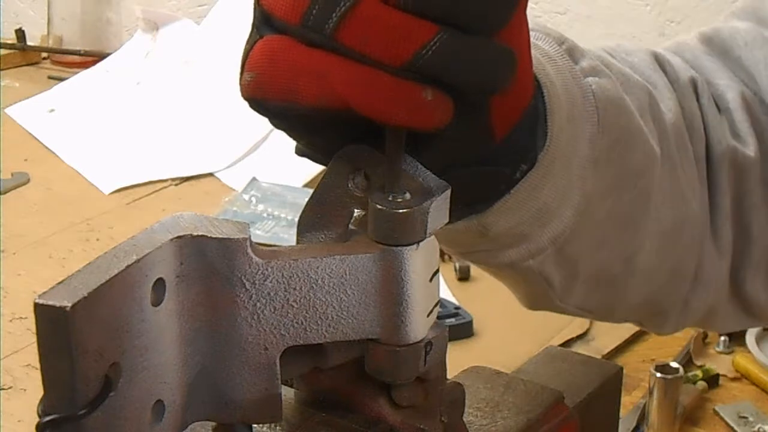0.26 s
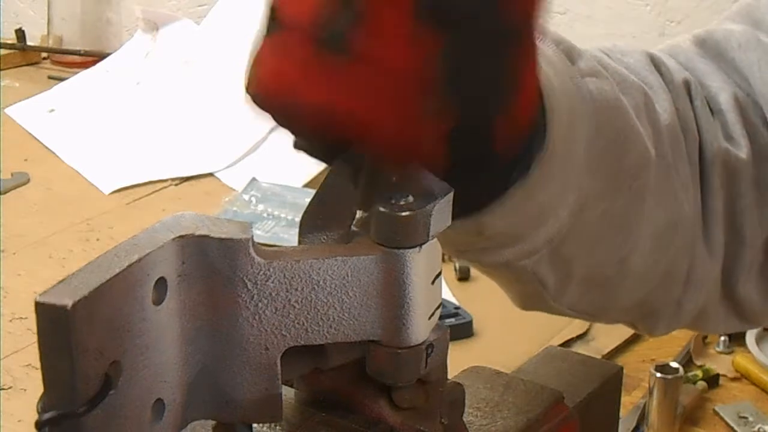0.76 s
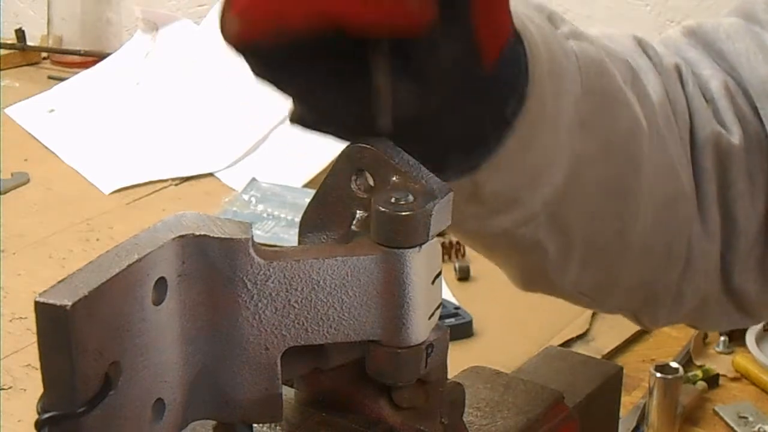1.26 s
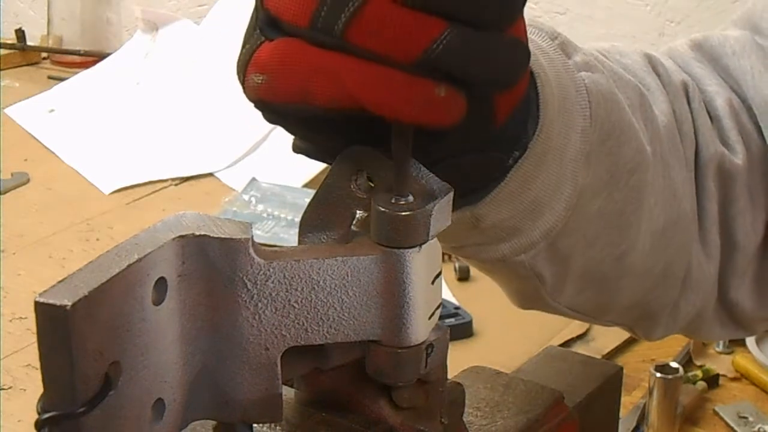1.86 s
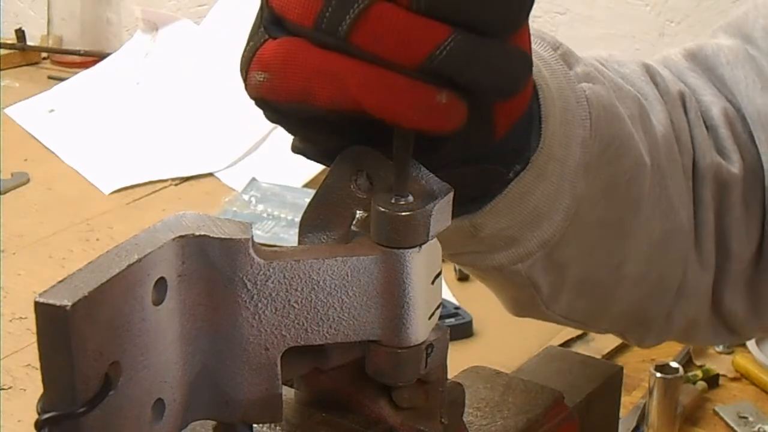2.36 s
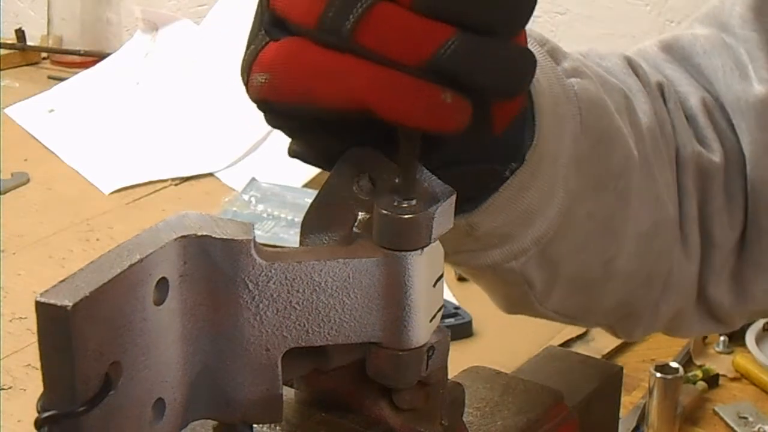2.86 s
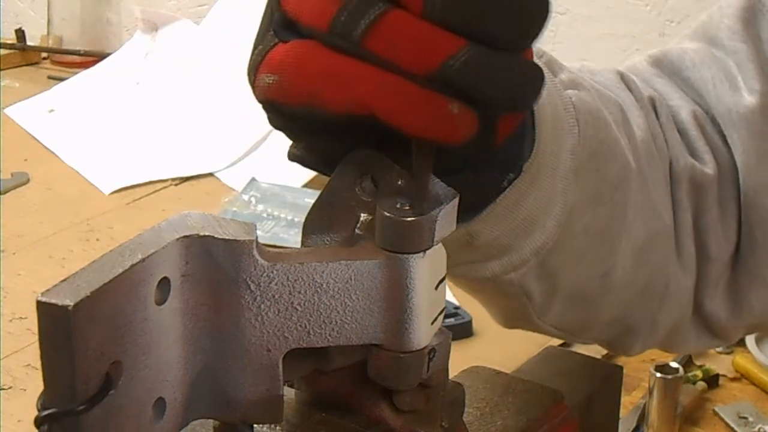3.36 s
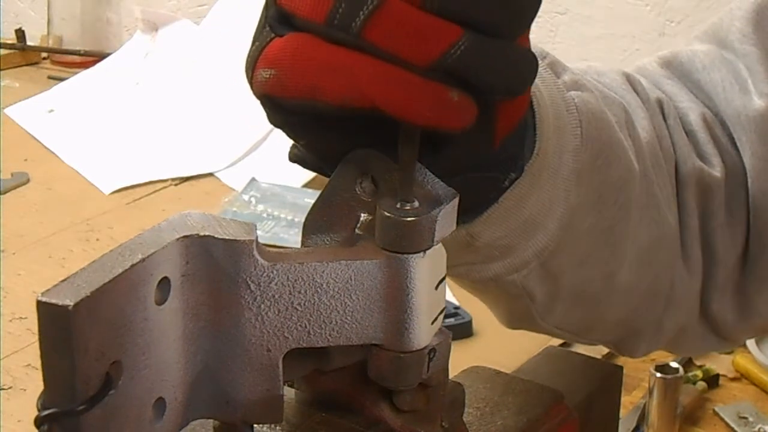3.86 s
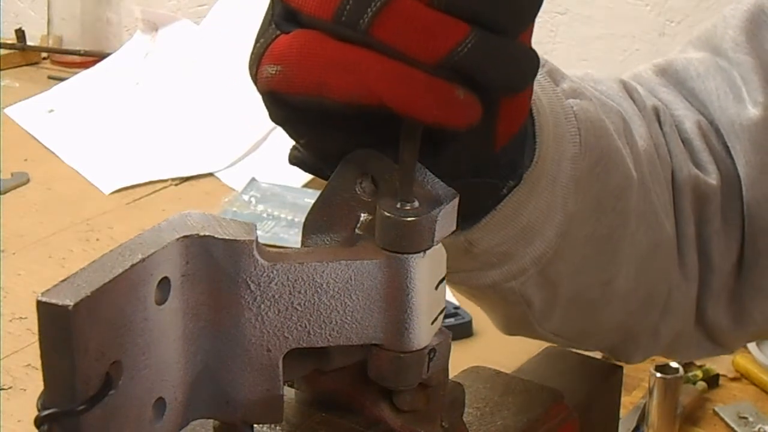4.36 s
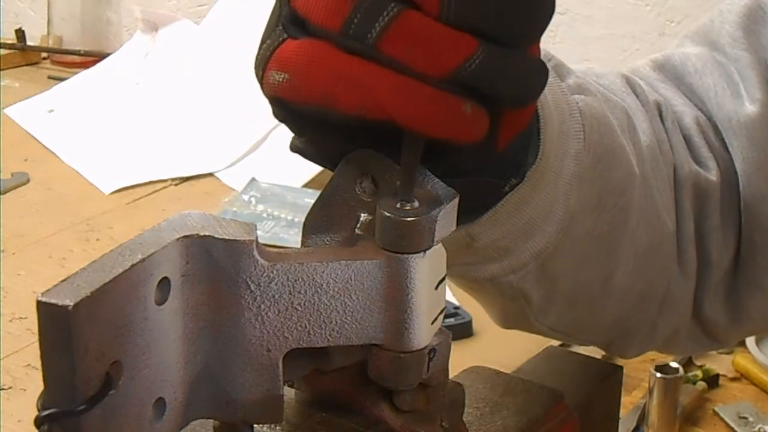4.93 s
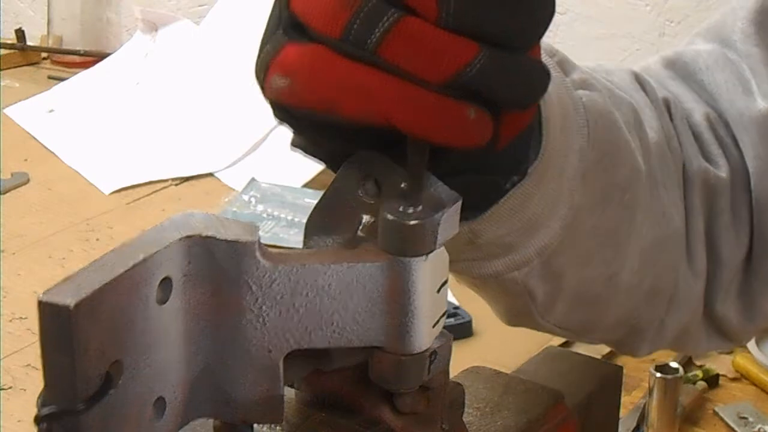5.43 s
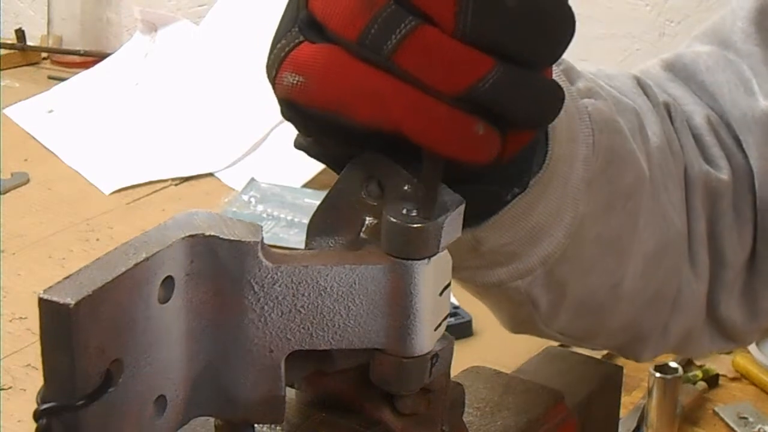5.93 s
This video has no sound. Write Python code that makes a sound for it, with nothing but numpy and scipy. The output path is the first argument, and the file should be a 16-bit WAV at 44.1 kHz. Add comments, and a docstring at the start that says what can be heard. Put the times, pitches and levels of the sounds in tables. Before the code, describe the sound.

A quiet, steady room hiss with a faint soft whine runs throughout. Glove and sleeve rub at the start, with a dull low bench bump near 0.3. At 0.5 and 0.8 two hard hammer blows hit a steel punch: an instant bright crack, then vise, hinge and small room swelling into a dense clang that dies within about a quarter second, crushed and crackling in the overloaded close microphone. A light double tap follows near 1.0, cloth rustle from 1.1, a faint hollow knock at 1.9 and ticks at 2.1 and 2.4. Stronger blows land at 2.8 and 3.15. A brighter double touch clicks at 3.4, a tick at 3.6, and a clearer hollow knock at 3.9 with a faint bump. Soft rustling and barely audible ticks fill the lull until three rapid heavy clangs at 5.5, 5.8 and 6.15, the last ringing slightly longer.

```python
"""Glove and sleeve rustle over steady room hiss, then a hammer drives a steel punch against a hinge pin in a vise.
Each blow sings in the punch, then sets hinge, vise, bench and small garage clanging, and overloads the microphone.
Between bursts: light hammer touches, hollow knocks as the punch is seated again, small ticks, dull bench bumps.
Metal is decaying sine modes plus shaped noise; cloth and air are shaped noise; the bench is a decaying sine."""
import sys
import numpy as np
from scipy import signal
from scipy.fft import rfft, irfft
from scipy.io import wavfile
from scipy.ndimage import uniform_filter1d, minimum_filter1d

SR = 44100
rng = np.random.default_rng(int(sys.argv[2]) if len(sys.argv) > 2 else 0)


def master_out(mix):
    """Clip the mix to full scale and print it as 16-bit PCM to the path in sys.argv[1]."""
    frames = np.transpose(np.atleast_2d(mix))
    ceiling = np.clip(frames, -1, 1)
    pcm = np.round(ceiling * 32767).astype(np.int16)
    wavfile.write(sys.argv[1], SR, pcm)


N = 272979
AGE_S = np.arange(int(0.6 * SR)) / SR  # time since a contact
CUTOFF_HZ = 11450

# All dB are relative; noise spectra give the colour only, "tilt" is brightness about 2 kHz.
# room air: (frequency [Hz], density [dB per Hz])
AIR_SPECTRUM = [(25, -31.5), (55, -6.5), (100, -17), (170, -12.5), (240, -5), (290, -10), (400, -5.5),
                (1000, -6), (2200, -7), (3000, -10.5), (5000, -17.5), (8000, -22.5), (11000, -34.5)]
# hand movements: (start [s], swell [s], hold [s], dying away [dB/s], rub [dB], swish [dB])
HAND_MOVES = [(0, 0.0022, .22, 43, -49.5, -52), (1.1, 0.084, 0.013, 17, -55.5, -62.5),
              (1.22, 0.12, 0, 54.5, -62, -57.5), (2.125, 0.046, 0, 318, -54.5, -51),
              (2.353, .075, .11, 24, -51.5, -56), (3.62, 0.04, 0.054, 35, -57.5, -64),
              (3.87, 0.1, 0.059, 16, -53, -61.5), (4.948, .4, 0.094, 49.5, -63.5, -63.5)]
# low cloth rub: (frequency [Hz], density [dB per Hz])
RUB_SPECTRUM = [(40, -16), (150, -9.5), (400, 0), (1000, 2), (2200, 4), (3200, -3.5), (6000, -13.5),
                (11000, -38)]
# higher cloth swish: (frequency [Hz], density [dB per Hz])
SWISH_SPECTRUM = [(800, -17.5), (2200, -1.5), (3800, 2), (6000, -7.5), (9000, -9.5), (11000, -26.5)]
# dull bumps through the bench: (time [s], level [dB])
BENCH_BUMPS = [(0.258, -55.5), (3.876, -63)]
# full blows: (time [s], force [dB], tilt of the clanging [dB/octave], clang t60 [ratio], clang rise [s])
FULL_BLOWS = [(0.5158, -7, 0, 1.15, 0.0031), (0.8104, -3.5, 0.74, 1.127, 0.0089),
              (2.8154, -1.5, 0.65, 1.07, 0.01), (3.1532, -2.5, 0.4, 1.14, 0.0091),
              (5.4810, -1.5, 0.56, 1.077, .011), (5.8329, -2, 0.63, 1.122, 0.015),
              (6.1602, -5, 0.35, 1.66, 0.0048)]
# steel-on-steel contact: (frequency [Hz], density [dB per Hz])
CRACK_SPECTRUM = [(60, -24), (500, -13.5), (1400, 1.5), (3000, -2.5), (4300, 0.5), (6000, -7.5),
                  (8000, -6.5), (9500, -17.5), (11000, -20.5)]
# punch under a full blow: (frequency [Hz], level [dB], t60 [s])
PUNCH_RING = [(1310, -9, .05), (3700, -8, .05), (4170, -6, .06), (7375, 7, .05), (7430, -9, .27)]
# lower ring of vise and hinge: (frequency [Hz], level [dB], t60 [s])
VISE_RING = [(326, -4, .26), (356, -3, .23), (394, -5, .22), (590, -6, .2), (633, -4, .24), (682, -3, .21),
             (775, 1, .24), (815, -2, .28), (895, -8, .23), (1025, -1, .24), (1151, -5, .23),
             (1186, -6, .24), (1300, -2, .22), (1366, -4, .2), (1430, -7, .22), (1643, -3, .24),
             (1684, -6, .3), (1724, -7, .3), (1826, -8, .3), (1934, -4, .3), (2040, -8, .26),
             (2175, -6, .27)]
# upper ring of vise and hinge: (frequency [Hz], level [dB], t60 [s])
HINGE_RING = [(2775, -9, .21), (3235, -8, .21), (3347, -7, .22), (3676, -3, .22), (3905, -6, .23),
              (4232, -7, .22), (4335, -2, .23), (4593, -5, .2), (5135, -4, .22), (5378, -6, .24),
              (5858, -10, .23), (6271, -9, .23), (6440, -10, .26), (7387, -7, .24)]
# dense clang of bench and room: (frequency [Hz], density [dB per Hz])
CLANG_SPECTRUM = [(25, -15.5), (60, -7), (130, -8.5), (260, -5), (350, 0.5), (500, 0.5), (800, 2),
                  (1500, 0), (2600, -3.5), (4000, -0.5), (5500, -5.5), (7500, -8), (9000, -13.5),
                  (11000, -31.5)]
# clang decay at length ratio 1: (frequency [Hz], t60 [s])
CLANG_DECAY = [(50, 0.28), (120, 0.24), (300, 0.28), (800, 0.26), (1900, 0.25), (3000, 0.23), (5000, 0.23),
               (7500, 0.19), (10000, 0.16)]
# light hammer touches: (time [s], force [dB], click sharpness [dB], ring tilt [dB/octave])
LIGHT_TAPS = [(1.024, -25, -25, -1), (1.040, -25.5, -13, -2), (3.4299, -30.5, 1, -1),
              (3.4414, -18, -1.5, 0.5)]
# click of a light touch: (frequency [Hz], density [dB per Hz])
TAP_CLICK_SPECTRUM = [(200, -24), (1000, -2.5), (1600, 0), (2500, 11), (3300, -5), (4300, 18), (5000, -7),
                      (5800, 9.5), (6700, -18.5), (7800, 5), (9500, -4.5), (11000, -49)]
# loosely held punch: (frequency [Hz], level [dB], t60 [s])
LOOSE_PUNCH_RING = [(770, -3, .34), (900, -2, .3), (1040, -2, .3), (1700, -8, .15), (2250, -6, .18),
                    (2449, -4, .2), (3101, -5, .22), (4090, -4, .17), (4317, -2, .24), (4500, -5, .17),
                    (5039, -6, .24), (5300, -7, .22), (5545, -5, .24), (5750, -6, .24), (5900, -6, .28)]
# punch seated in the pin hole: (time [s], force [dB], pitch [ratio], late ring tilt [dB/octave], ring freedom [dB])
SEATING_KNOCKS = [(1.8860, -38, 0.81, -2.5, -3.5), (3.8611, -27, 0.99, -4, 0.5), (4.727, -48, 0.91, -1, -5)]
# hollow knock at first: (frequency [Hz], density [dB per Hz])
KNOCK_CLICK_SPECTRUM = [(200, -70.5), (800, 7), (1900, 28), (3000, 1), (4300, 14), (6000, -32.5),
                        (11000, -56)]
# hollow knock returned by the room: (frequency [Hz], density [dB per Hz])
KNOCK_ROOM_SPECTRUM = [(150, -29), (500, -5.5), (900, 6.5), (1500, -5), (2000, 0), (3000, -15), (9000, -40)]
# punch in its hole, at pitch ratio 1, before extra damping: (frequency [Hz], level [dB], t60 [s])
SEATED_RING = [(766, -7, .2), (1140, -8, .18), (1250, -3, .2), (1836, -6, .15), (1936, 2, .2),
               (2400, -11, .05), (3850, -18, .04)]
# small ticks of the gripped punch: (time [s], level [dB])
GRIP_TICKS = [(2.061, -46), (2.419, -37), (3.606, -49), (4.514, -49.5), (5.378, -51)]


def from_db(db):
    """Decibels to gain."""
    return 10 ** (np.asarray(db) / 20)


def rms_one(x):
    """Scale to unit rms."""
    return x / np.sqrt(np.mean(x ** 2) + 1e-20)


def at_hz(points, hz):
    """Read a table on a log-frequency axis."""
    known_hz, values = np.transpose(points)
    return np.interp(np.log(hz + 1), np.log(known_hz), values)


def bins_hz(size):
    """Frequencies of a real spectrum."""
    return np.arange(size // 2 + 1) * SR / size


def noise(spectrum, size):
    """Gaussian noise of a given colour, rms 1."""
    white = rfft(rng.standard_normal(size))
    gain = from_db(at_hz(spectrum, bins_hz(size)))
    return rms_one(irfft(white * gain, size))


def fade(t60_s):
    """Exponential decay after a contact, 60 dB in t60."""
    return np.exp(-np.log(1000) * AGE_S / max(t60_s, 1e-3))


def add(track, time_s, sound):
    """Mix a sound in at a time."""
    start = max(round(time_s * SR), 0)
    track[start:start + len(sound)] += sound[:max(N - start, 0)]


def air(air_db=-59, whine_hz=2270, whine_width_hz=150, whine_db=-67):
    """Steady broadband hiss with one soft resonance standing out."""
    b, a = signal.iirpeak(whine_hz, whine_hz / whine_width_hz, fs=SR)
    whine = rms_one(signal.lfilter(b, a, rng.standard_normal(N)))
    return from_db(air_db) * noise(AIR_SPECTRUM, N) + from_db(whine_db) * whine


def cloth(grain_rms_db=1.0):
    """Fabric slides on fabric in fine grains; each hand movement drives a low rub and a higher swish."""
    t = np.arange(N) / SR
    rub_power, swish_power = 0, 0
    for start_s, swell_s, hold_s, fall_db_per_s, rub_db, swish_db in HAND_MOVES:
        push = np.clip((t - start_s) / max(swell_s, 1e-3), 0, 1)
        falling_s = np.maximum(t - start_s - swell_s - hold_s, 0)
        speed = push * from_db(-fall_db_per_s * falling_s)
        rub_power = rub_power + (speed * from_db(rub_db)) ** 2
        swish_power = swish_power + (speed * from_db(swish_db)) ** 2
    flutter = rms_one(uniform_filter1d(rng.standard_normal(N), size=200))
    grain = from_db(grain_rms_db * flutter)
    rub = np.sqrt(rub_power) * noise(RUB_SPECTRUM, N)
    swish = np.sqrt(swish_power) * noise(SWISH_SPECTRUM, N)
    return grain * (rub + swish)


def bench(hz, t60_s):
    """The workbench flexes under a push: one decaying low sine."""
    return np.sin(2 * np.pi * hz * AGE_S) * fade(t60_s)


def bumps():
    """Dull bumps flex the bench."""
    out = np.zeros(N)
    for time_s, level_db in BENCH_BUMPS:
        add(out, time_s, from_db(level_db) * bench(hz=62, t60_s=0.52))
    return out


def ring(modes, pitch=1, tilt_db=0, wet=0.6, scatter_hz=55):
    """Struck modes; reflections add a wandering share that makes each one beat and blur."""
    out = 0
    wet = np.clip(wet, 0, 1)  # power share of the reflections
    for hz, level_db, t60_s in modes:
        luck = rng.standard_normal((2, 256))
        # complex gain: a new random point scatter_hz times a second
        points = luck[0] + 1j * luck[1]
        echoes = np.interp(AGE_S * scatter_hz, np.arange(len(points)), points) / np.sqrt(2)
        carrier = np.exp(2j * np.pi * (hz * pitch * AGE_S + rng.random()))
        tone = (np.sqrt(1 - wet) + np.sqrt(wet) * echoes) * carrier
        gain = from_db(level_db + tilt_db * np.log2(hz / 2000))
        out = out + gain * fade(t60_s) * tone.real
    return out


def clang(length=1, tilt_db=0):
    """Countless overlapping modes and wall reflections as noise, each band dying at its own rate."""
    size = len(AGE_S)
    hz = bins_hz(size)
    tilt = from_db(tilt_db * np.log2((hz + 200) / 2000))
    dense = rfft(noise(CLANG_SPECTRUM, size)) * tilt
    band_log_hz = np.log(np.array(CLANG_DECAY)[:, 0])
    out = 0
    for share, (_, t60_s) in zip(np.eye(len(CLANG_DECAY)), CLANG_DECAY):
        band = np.interp(np.log(hz + 1), band_log_hz, share)  # overlapping triangles
        out = out + irfft(dense * band, size) * fade(t60_s * length)
    return out


def swell(delay_s, rise_s):
    """Heavy parts and room take a few milliseconds to answer."""
    return 1 - np.exp(-(np.maximum(AGE_S - delay_s, 0) / rise_s) ** 2)


def blows(crack_db=-8, crack_t60_s=0.078, punch_db=-12, vise_db=-12.0, hinge_db=-13,
          clang_db=-1, early_db=4.5, early_s=0.053, bench_db=-27):
    """The punch cracks and sings at once; hinge, vise and room swell in after it, over a flexing bench."""
    out = np.zeros(N)
    early = from_db(early_db * np.exp(-(AGE_S / early_s) ** 4))  # first wall reflections arrive in a bunch
    for time_s, force_db, tilt_db, length, rise_s in FULL_BLOWS:
        crack = from_db(crack_db) * noise(CRACK_SPECTRUM, len(AGE_S)) * fade(crack_t60_s)
        punch = from_db(punch_db) * ring(PUNCH_RING, wet=0.15)
        vise = from_db(vise_db) * ring(VISE_RING, tilt_db=tilt_db, wet=0.4, scatter_hz=30.65)
        hinge = from_db(hinge_db) * ring(HINGE_RING, tilt_db=tilt_db, wet=0.84, scatter_hz=64.73)
        room = from_db(clang_db) * clang(length, tilt_db)
        body = (vise + hinge + room) * swell(0.0012, rise_s) * early
        flex = from_db(bench_db) * bench(hz=48, t60_s=0.34)
        add(out, time_s, from_db(force_db) * (crack + punch + body + flex))
    return out


def taps(click_t60_s=0.05, modes_db=-20, room_db=-19):
    """A light touch clicks, with the loosely held punch and the room ringing behind it."""
    out = np.zeros(N)
    for time_s, force_db, sharp_db, tilt_db in LIGHT_TAPS:
        click = from_db(sharp_db) * noise(TAP_CLICK_SPECTRUM, len(AGE_S)) * fade(click_t60_s)
        punch = from_db(modes_db) * ring(LOOSE_PUNCH_RING, tilt_db=tilt_db, wet=0.8, scatter_hz=105.0)
        room = from_db(room_db) * clang(1.0, -0.28)
        body = (punch + room) * swell(0, 0.0078)
        add(out, time_s, from_db(force_db) * (click + body))
    return out


def knocks(click_db=-1, strike_db=-1, modes_db=-2, room_db=-8):
    """The punch drops into its hole with a hollow knock that the room carries on."""
    out = np.zeros(N)
    for time_s, force_db, pitch, tilt_db, free_db in SEATING_KNOCKS:
        click = from_db(click_db) * noise(KNOCK_CLICK_SPECTRUM, len(AGE_S)) * fade(0.022)
        strike = from_db(strike_db + free_db) * ring(SEATED_RING, pitch, wet=0.084)
        strike = strike * fade(0.078) * swell(0, 0.00082)
        late_ring = from_db(modes_db + free_db) * ring(SEATED_RING, pitch, tilt_db, wet=0.6, scatter_hz=60)
        room = from_db(room_db) * noise(KNOCK_ROOM_SPECTRUM, len(AGE_S)) * fade(0.39)
        after = (late_ring + room) * swell(0.0046, 0.0042)
        add(out, time_s, from_db(force_db) * (click + strike + after))
    return out


def ticks(room_db=-19):
    """The punch ticks under the glove: a very short steel contact and a faint clang."""
    out = np.zeros(N)
    for time_s, level_db in GRIP_TICKS:
        contact = noise(CRACK_SPECTRUM, len(AGE_S)) * fade(0.008)
        add(out, time_s, from_db(level_db) * (contact + from_db(room_db) * clang()))
    return out


def scene():
    """Everything at the bench, heard by one microphone."""
    return (air() + cloth() + bumps() + blows() + taps() + knocks() + ticks())[None]


def record(dry, threshold_db=-6.0, release_db_per_s=380, top=0.7, dull_hz=10100):
    """A fast limiter holds the blows down; the rest saturates, and the tallest crests overflow with a crackle."""
    power = uniform_filter1d(dry[0] ** 2, size=180)
    level_db = 10 * np.log10(np.maximum(power, 1e-12))
    # running maximum over a rising ramp: instant attack, linear dB release
    ramp_db = release_db_per_s * np.arange(N) / SR
    over_db = np.maximum(level_db - threshold_db, 0)
    cut_db = np.maximum.accumulate(over_db + ramp_db) - ramp_db
    held = dry * from_db(-cut_db)
    # an overflowing crest wraps to the other polarity for two samples
    height = np.abs(held)
    crest = height == -minimum_filter1d(-height, size=9)
    overflow = crest & (height > 2.25 * from_db(threshold_db))
    flips = signal.lfilter([1, 1], [1], np.sign(held) * overflow)
    wrapped = top * (np.tanh(held / top) - 2 * flips)
    dull_filter = signal.butter(4, dull_hz, fs=SR, output="sos")
    soft = signal.sosfiltfilt(dull_filter, wrapped)
    band_limit = signal.cheby2(16, 60, CUTOFF_HZ, fs=SR, output="sos")
    return signal.sosfilt(band_limit, soft)


dry = scene()
out = record(dry)
master_out(out)
```